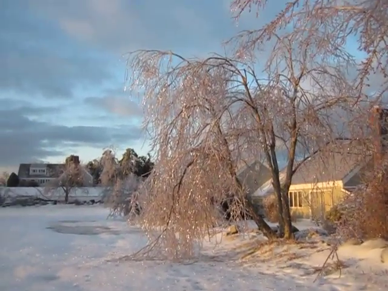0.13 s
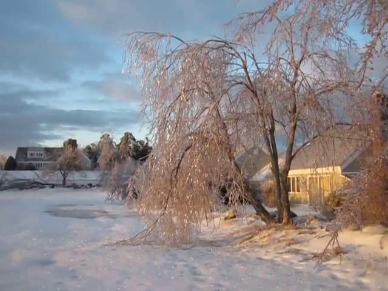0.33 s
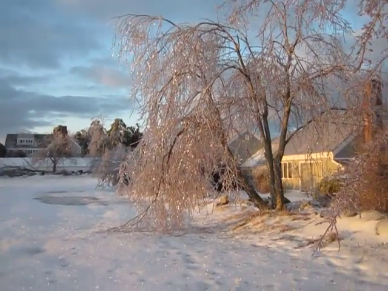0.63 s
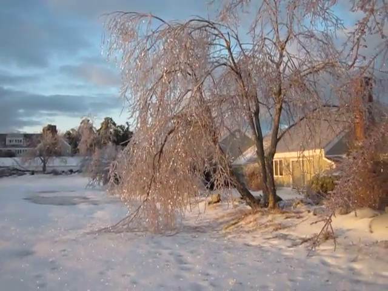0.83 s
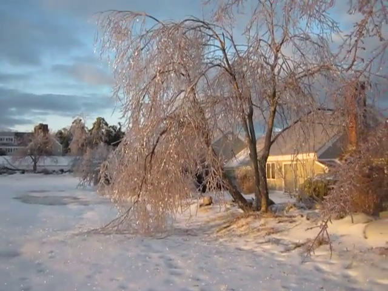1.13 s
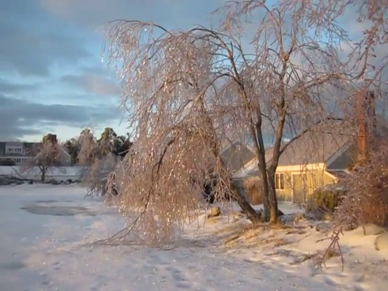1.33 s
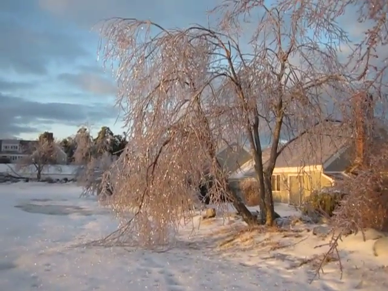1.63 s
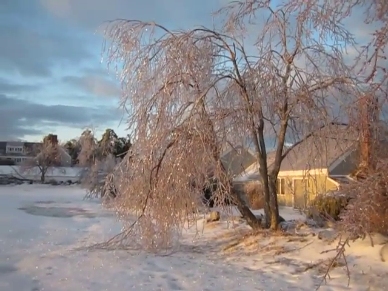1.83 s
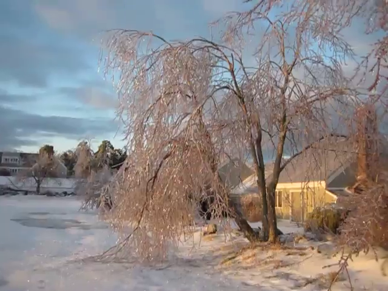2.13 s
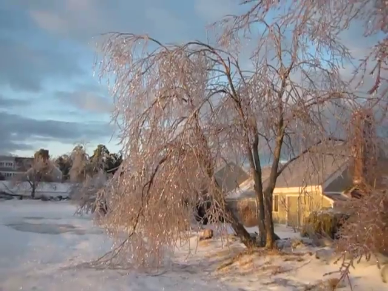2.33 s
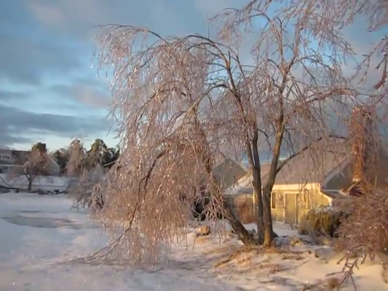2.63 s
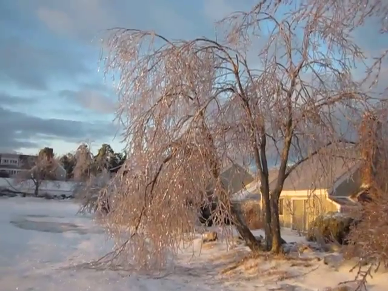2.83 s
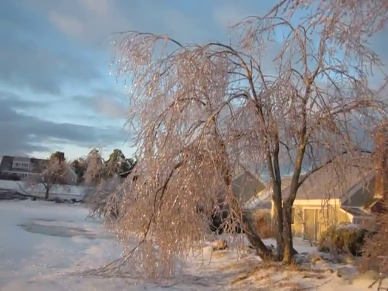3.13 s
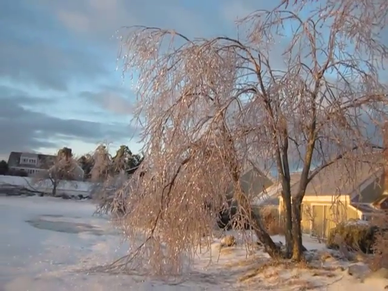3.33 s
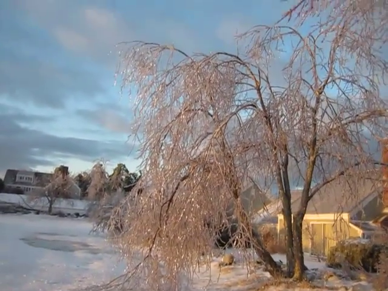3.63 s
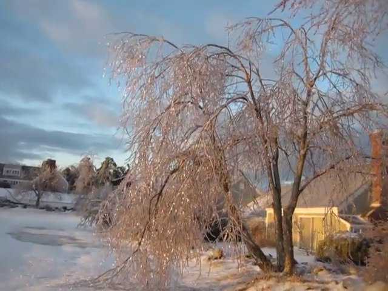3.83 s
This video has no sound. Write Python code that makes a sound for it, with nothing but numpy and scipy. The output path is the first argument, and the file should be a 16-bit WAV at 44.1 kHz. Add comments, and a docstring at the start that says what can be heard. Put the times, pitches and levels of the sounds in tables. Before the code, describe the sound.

Ice-coated twigs crack and tick sharply outdoors, with wind thumps on the microphone and faint hiss.

```python
"""Frozen twigs outdoors on a winter morning, close to a small camera: ice cracks and ticks.
Cracks and icy crumbs are noise bursts and random clicks through resonances; some cracks
set a small hard object ringing, as decaying sines. Splinters hiss after a few breaks.
Wind puffs thump the microphone as short falling-pitch swings over a low lumpy rumble.
The camera adds shaped noise as hiss and a narrow noise band as a thin whine."""
import sys
import numpy as np
from scipy import signal
from scipy.fft import rfft, irfft
from scipy.io import wavfile
from scipy.ndimage import uniform_filter1d

SR = 44100
rng = np.random.default_rng(int(sys.argv[2]) if len(sys.argv) > 2 else 0)


def log_audio(samples):
    """Write samples as a 16-bit WAV file to the path given in sys.argv[1]."""
    # one column per channel
    frames = np.atleast_2d(samples).T
    # limit to full scale, then quantise
    limited = np.clip(frames, -1, 1)
    pcm = np.round(limited * 32767).astype(np.int16)
    wavfile.write(sys.argv[1], SR, pcm)


N = 176400


def gain_of(db):
    """Decibels to amplitude gain."""
    return 10 ** (np.asarray(db) / 20)


def evened(x):
    """Scales to rms 1."""
    return x / np.sqrt(np.mean(x ** 2) + 1e-20)


def add(mix, start_s, sound):
    """Mixes a sound in at a time, cut at the end of the mix."""
    part = mix[max(round(start_s * SR), 0):][:len(sound)]
    part += sound[:len(part)]


def resonate(x, hz, pass_width_hz):
    """A two-pole band-pass, applied three times for steep sides."""
    b, a = signal.iirpeak(hz, hz / max(pass_width_hz, 5), SR)
    for _ in range(3):
        x = signal.lfilter(b, a, x)
    return x


def body(x, modes):
    """Colours a sound by parallel resonances of alternating polarity."""
    out = 0
    for k, (hz, pass_width_hz, level_db) in enumerate(modes):
        out = out + (-1) ** k * gain_of(level_db) * resonate(x, hz, pass_width_hz)
    return out


def follow(curve, column):
    """Gain over time from one dB column of a curve, linear in dB between rows."""
    rows = np.array(curve)
    return gain_of(np.interp(np.arange(N) / SR, rows[:, 0], rows[:, column]))


def grains(rate_per_s, spread_db):
    """Clicks at random times, random in sign and size, a few of them large."""
    boost_db = spread_db * np.minimum(rng.exponential(1, N), 4)
    size = gain_of(boost_db) * rng.standard_normal(N)
    return size * (rng.random(N) < rate_per_s / SR)


# Resonances of the four parts of a crack, low to high: pitch_hz, pass_width_hz, level_db
KNOCK = [(340, 446, 1.5), (650, 980, -4)]
SNAP = [(1096, 1070, 4.96), (1553, 523, 4.35), (1840, 810, 3.9)]
TICK = [(2934, 1300, 1.5), (3920, 1100, -5.5), (5155, 2100, 1.7)]
FIZZ = [(8970, 3700, -1), (11480, 3500, 3.5), (13700, 11400, -11)]
PARTS = [KNOCK, SNAP, TICK, FIZZ]
# Ice cracks: start_s, knock_db, snap_db, tick_db, fizz_db, length_ms
CRACKS = [(0.033, -72, -34.0, -55, -53, 2.1), (0.1096, -57, -43.5, -53, -57, 5.6),
          (0.3653, -43, -42, -55, -65, 3.4), (0.376, -45, -38, -64, -60, 8.9),
          (0.4122, -35.5, -38, -64, -50, 4.8), (0.4658, -45, -35, -42.5, -57, 1.6),
          (0.4808, -53, -55, -58, -47.5, 1.8), (0.5108, -63, -41.0, -40, -54, 0.98),
          (0.5184, -66, -60, -41, -37.5, 4.5), (0.529, -60, -24, -35, -58, 1.65),
          (0.5631, -35, -24, -24, -63, 2.8), (0.5774, -33, -25, -26.5, -46, 2.6),
          (0.6282, -40, -38, -47, -52, 11), (0.681, -58, -55, -37, -44, 7),
          (0.688, -54, -51.0, -38.5, -61, 0.7), (0.806, -43.5, -31, -44, -69, 1.7),
          (0.8881, -47, -28, -32.5, -66, 4.3), (0.9489, -47, -31, -39, -46, 15),
          (1.0266, -61, -63, -43, -51, 0.55), (1.125, -57, -60, -39, -42, 0.69),
          (1.1356, -39.5, -52, -33, -35.5, 1.5), (1.1387, -36.5, -28, -29.5, -33.5, 3.4),
          (1.15, -60, -27, -36, -45, 3.1), (1.1636, -66, -54, -42, -40, 1.5),
          (1.1973, -53, -24.5, -31, -52, 4.7), (1.288, -69, -60.0, -38.5, -47, 1),
          (1.302, -63, -31, -26, -66, 2.2), (1.3385, -73, -64, -38.5, -53.0, 1.6),
          (1.3606, -69, -61, -44, -49, 0.89), (1.4122, -44, -33, -40, -72.0, 5.1),
          (1.4196, -55, -34, -42, -67, 3.1), (1.437, -64, -38, -39, -52.0, 0.86),
          (1.5232, -65, -34.5, -40.5, -53.5, 2.2), (1.5322, -61.0, -29, -42, -68.0, 4.3),
          (1.555, -45, -34.5, -42.5, -63, 3.3), (1.7414, -49, -31.5, -46, -76, 2.9),
          (1.8147, -51, -39, -53, -70.0, 2), (1.8992, -21.5, -26.5, -25, -32.5, 3.4),
          (2.0522, -42.5, -39.5, -44.5, -37.5, 9.7), (2.0821, -29.5, -30, -35, -39, 3.8),
          (2.0879, -49, -36, -57, -37.5, 7.8), (2.097, -43, -31, -44, -45.0, 3),
          (2.1247, -30.5, -25, -39, -48, 1.9), (2.1837, -46, -30, -34.5, -59, 2.4),
          (2.1974, -46, -46, -37.5, -58.0, 1.9), (2.2071, -32, -60, -66, -66.0, 9.1),
          (2.215, -56, -37, -41, -71.0, 2.8), (2.257, -60, -35.5, -50, -73.0, 3),
          (2.272, -46, -23, -22.5, -52, 2.3), (2.3024, -41, -36, -40.5, -59, 3.7),
          (2.428, -54, -46, -46, -58, 1.5), (2.3152, -33, -36.5, -50, -53, 1.6),
          (2.3976, -27.5, -32.5, -52, -50.0, 1.6), (2.401, -36, -29.5, -37.5, -43, 8.4),
          (2.4139, -47.0, -25.5, -34, -52, 3.9), (2.5448, -44, -26, -28.5, -50, 4.2),
          (2.6333, -34.5, -35.5, -41, -59, 4.7), (2.646, -34, -38, -37.5, -57, 2.2),
          (2.655, -35, -25, -37.5, -49, 5.8), (2.7345, -65, -38.5, -62, -68, 2.4),
          (2.8228, -20.5, -46, -43.5, -45, 2.1), (2.83, -33, -40, -39, -50, 5),
          (2.846, -32.5, -41, -37.5, -42.5, 2.4), (2.8693, -46, -36.5, -47, -49, 1.7),
          (2.9118, -54, -29, -36, -62, 2.9), (2.9464, -22, -27, -34.5, -38, 6.0),
          (2.9704, -29, -29.5, -33, -34.5, 3.9), (2.9843, -33, -37, -42, -42.0, 2.4),
          (3.013, -57, -31, -31.5, -37.5, 34), (3.03, -20.5, -21.5, -30, -41, 4.4),
          (3.0357, -37, -41, -40, -48, 11), (3.0915, -36, -34, -44, -53, 3.4),
          (3.136, -63, -28.5, -56, -73.0, 1.9), (3.2584, -65, -65, -52, -47, 0.89),
          (3.2629, -33, -40, -44, -51, 3.6), (3.267, -28.5, -35.5, -39.5, -44, 4.3),
          (3.2736, -35, -32.5, -48, -45, 2.9), (3.285, -30.5, -38, -38.5, -47, 7),
          (3.336, -35.5, -42, -48, -50, 3), (3.355, -43, -43, -46, -50, 8),
          (3.369, -36.5, -39, -43, -50, 5.1), (3.4075, -39, -41, -48, -58, 8),
          (3.3812, -30, -43, -41.5, -52, 1.3), (3.4215, -35.5, -55, -47, -47.5, 10),
          (3.439, -32, -56, -49, -63, 4.1), (3.4617, -31.5, -40, -40, -51, 2.3),
          (3.4777, -45, -34, -35, -66, 1.3), (3.5394, -44, -43, -39, -48.5, 3.1),
          (3.561, -51, -35, -32, -52, 1.8), (3.5927, -35.5, -30.5, -42, -55.0, 15),
          (3.6048, -29.5, -36, -42, -45, 7), (3.6128, -56, -27.5, -32, -36, 5.6),
          (3.6494, -59, -46, -43, -55, 2.3), (3.6883, -44, -32.5, -44, -65, 2.3),
          (3.6957, -55, -24.5, -42, -63, 3), (3.7063, -44, -30.5, -41, -49, 0.93),
          (3.7232, -61, -26.5, -27.5, -36, 10), (3.7489, -46, -23, -24.5, -52, 5.7),
          (3.7718, -41, -32, -36, -60.0, 8.7), (3.7794, -41, -46, -46, -61.0, 5),
          (3.796, -49, -51, -41, -71.0, 1.6), (3.807, -62, -58, -43, -67, 1.5),
          (3.8747, -43, -29.0, -41, -61, 4), (3.9505, -59, -35.0, -32, -59, 1.8)]
FIRST_BREAK = 16.3  # first sample = this / length_ms
TAIL_DB, TAIL_S = [-19, -5, -9.5, 5], 0.0056  # scatter off the snow, per part


def cracks():
    """A sharp break, then fading noise for a run of smaller ones, excites four resonant parts."""
    out, t = np.zeros(N), np.arange(2000) / SR
    rows = np.array(CRACKS)
    length_ms = rows[:, 5]
    noise = rng.standard_normal((len(rows), len(t)))
    noise[:, 0] = FIRST_BREAK / length_ms  # short cracks start hardest
    fall = np.exp(-2 * t / np.maximum(length_ms[:, None] / 1000, 2e-4))
    mix = 0
    for k, part in enumerate(PARTS):
        tail = gain_of(TAIL_DB[k]) * np.exp(-t / TAIL_S)
        sound = body(noise * (fall + tail), part)
        # 0 dB = the energy of 300 samples at rms 1
        strength = np.sqrt((sound ** 2).sum(1, keepdims=True) / 300)
        mix = mix + gain_of(rows[:, 1 + k:2 + k]) * sound / strength
    for start_s, sound in zip(rows[:, 0], mix):
        add(out, start_s, sound)
    return out


def tone(hz, level_db, t60_s):
    """A sine losing 60 dB per t60_s, after a 4.6 ms linear swell."""
    t = np.arange(SR // 2) / SR
    swell = np.minimum(t / 0.0046, 1)
    return gain_of(level_db - 60 * t / t60_s) * np.sin(2 * np.pi * hz * t) * swell


# Tones of the ringing object, lower then upper: pitch_hz, t60_s
RING = [(1021, .29), (1931, .1)]
# Cracks that set the object ringing: start_s, lower_tone_db, upper_tone_db
RINGS = [(0.525, -32, -25.5), (0.5633, -33, -44), (0.5785, -27.5, -42), (0.806, -38.5, -36.5),
         (0.8884, -40.5, -44), (0.9491, -43, -35), (1.1491, -40.5, -29), (1.198, -41, -33.5),
         (1.5326, -41, -43), (1.7421, -46, -36), (2.183, -39, -41), (2.257, -33.5, -56), (2.2724, -65, -35),
         (2.4042, -35.5, -40), (2.9144, -36, -37), (3.0153, -55, -29.5), (3.1357, -38.5, -41),
         (3.7294, -54, -33), (3.756, -33.5, -44), (3.7793, -60, -36), (3.8753, -37, -58)]
# Ping of one icicle: start_s, pitch_hz, level_db, t60_s
PING = [(.579, 3575, -53, 1.5), (.579, 4463, -56, .7)]


def rings():
    """Two modes of a small hard object, and an icicle's ping, die away as sines."""
    out = np.zeros(N)
    for start_s, *levels_db in RINGS:
        for (hz, t60_s), level_db in zip(RING, levels_db):
            add(out, start_s, tone(hz, level_db, t60_s))
    for start_s, hz, level_db, t60_s in PING:
        add(out, start_s, tone(hz, level_db, t60_s))
    return out


# Splinters falling after breaks: start_s, level_db, fade_s
SHATTERS = [(1.905, -47, .08), (3.3, -49, .17), (3.54, -49, .1)]


def shatter():
    """Fine splinters: dense clicks through the tick resonances, under a Gaussian fade."""
    t = np.arange(N) / SR
    fall = 0
    for start_s, level_db, fade_s in SHATTERS:
        fall = fall + gain_of(level_db) * (t > start_s) * np.exp(-((t - start_s) / fade_s) ** 2)
    return fall * evened(body(grains(rate_per_s=6000, spread_db=3), TICK))


# Icy crumbs: start_s, low_crunch_db, middle_db, treble_db
RUSTLE = [(0, -49.5, -38, -46), (0.07, -59.5, -52.5, -68), (0.355, -56.5, -55, -68), (0.37, -41, -45, -63),
          (0.48, -38, -46.5, -55), (0.5, -57, -51, -59), (0.6, -54.5, -55, -62.5), (1.1, -62, -55.5, -64),
          (1.14, -62, -42.5, -53), (1.21, -46.5, -48, -60), (1.58, -71, -51.5, -67),
          (1.89, -53.5, -56, -75), (1.91, -47, -48.5, -51), (2.02, -57, -54, -63), (2.06, -59, -51, -60),
          (2.11, -46, -48, -49), (2.17, -50, -52, -62), (2.61, -57, -56, -71), (2.65, -39, -54, -50),
          (2.7, -69, -49.5, -65), (2.81, -43, -58.5, -66), (2.85, -45, -45, -53), (2.9, -57, -53, -68),
          (2.96, -43, -49.5, -58), (3.04, -51, -38, -44), (3.12, -57, -51.5, -61), (3.24, -58, -57, -71),
          (3.28, -38, -41, -44), (3.31, -53, -52, -56.5), (3.38, -45, -50, -49.5), (3.47, -47, -47, -53.5),
          (3.52, -53, -52.5, -61), (3.61, -39.5, -42, -46), (3.66, -61, -52.5, -60), (3.72, -42, -40, -47),
          (3.81, -61, -50.5, -65), (4, -51.5, -49, -67)]
# Grain rate of knock, snap, tick, fizz: rate_per_s
GRAINS_PER_S = [1300, 3000, 6000, 8000]
# Grain size spread of knock, snap, tick, fizz: spread_db
GRAIN_SPREAD_DB = [3.6, 3.6, 3, 3]
CLUMP_S, CLUMP_DB = 0.01, 3.5  # smoothing window, rms level swing
TICK_GRAINS_DB = -5  # relative to the snap grains


def rustle():
    """Dense icy grains in clumps, coarse ones low and fine ones high."""
    knock, snap, tick, fizz = [evened(body(grains(rate_per_s, spread_db), part))
                               for rate_per_s, spread_db, part
                               in zip(GRAINS_PER_S, GRAIN_SPREAD_DB, PARTS)]
    width = round(CLUMP_S * SR)
    drift = uniform_filter1d(uniform_filter1d(rng.standard_normal(N), width), width)
    clumps = evened(gain_of(CLUMP_DB * evened(drift)))
    low = follow(RUSTLE, column=1) * knock
    middle = follow(RUSTLE, column=2) * (snap + gain_of(TICK_GRAINS_DB) * tick)
    treble = follow(RUSTLE, column=3) * fizz
    return clumps * (low + middle + treble)


def far_ticks():
    """Tiny bright ticks from twigs further off: sparse clicks of widely spread size."""
    out = 0
    for part, level_db in [(FIZZ, -75.5), (TICK, -69.5)]:
        clicks = grains(rate_per_s=41, spread_db=11.5)
        out = out + gain_of(level_db) * evened(body(clicks, part))
    return out


# Wind puffs: centre_s, level_db, pitch_hz
THUMPS = [(0.018, -31, 147), (0.572, -26, 114), (1.1453, -24, 170), (1.4264, -24.5, 108), (1.5208, -31, 97),
          (1.56, -30.5, 138), (1.589, -15, 118), (1.6, -17, 129), (1.63, -17, 148), (1.656, -26.5, 89.5),
          (1.6684, -25.5, 144), (1.9019, -15, 163), (1.915, -21, 109), (2.0907, -28, 92),
          (2.1187, -28, 108), (2.1435, -20, 144), (2.1863, -28, 70), (2.2125, -19, 139), (2.289, -31.5, 99),
          (3.0868, -28.5, 115), (3.284, -27.5, 127), (3.6128, -26, 164)]
THUMP_TURNS = 0.45  # cycles from the centre to 1/e
THUMP_SAG = 0.42  # pitch fall through each puff


def thumps():
    """Each puff swings the membrane briefly: two Gaussian wavelets of falling pitch."""
    out, t = np.zeros(N), np.arange(-700, 1500) / SR
    phases = rng.uniform(0, 2 * np.pi, len(THUMPS))
    for (centre_s, level_db, hz), phase in zip(THUMPS, phases):
        wave = 0
        for ratio, partial_db in [(1, 0), (2.2, -9)]:
            turns = hz * ratio * t
            swell = np.exp(-(turns / THUMP_TURNS) ** 2)
            swing = np.cos(2 * np.pi * (turns - THUMP_SAG * turns ** 2) + phase)
            wave = wave + gain_of(partial_db) * swell * swing
        add(out, centre_s + t[0], gain_of(level_db) * wave)
    return out


# Wind rumble: start_s, level_db
RUMBLE = [(0, -64.5), (1.35, -56.5), (1.6, -32), (1.75, -45), (2.0, -47), (2.15, -33), (2.35, -55.5),
          (4, -57)]


def rumble():
    """Low lumpy wind noise: random clicks through one low resonance."""
    lumps = resonate(grains(rate_per_s=90, spread_db=4.2), hz=66, pass_width_hz=150)
    return follow(RUMBLE, column=1) * evened(lumps)


# Spectrum shape of the camera's hiss: frequency_hz, relative_db_per_hz
HISS = [(12, -38), (20, 3.5), (142, 3), (624, -6.5), (1000, -6.5), (1260, -16), (1570, -5), (2750, -13),
        (5080, -21.5), (7950, -18), (12400, -33.5), (16000, -25)]
HISS_DB = -50.5
WHINE_HZ, WHINE_PASS_WIDTH_HZ, WHINE_DB = 7868, 60, -74


def hiss():
    """Steady camera noise shaped in frequency, and a narrow noise band as the thin whine."""
    hz = np.fft.rfftfreq(N, 1 / SR)
    curve_hz, curve_db = np.transpose(HISS)
    shape = gain_of(np.interp(np.log(hz + 1), np.log(curve_hz + 1), curve_db))
    floor = irfft(rfft(rng.standard_normal(N)) * shape, N)
    whine = resonate(rng.standard_normal(N), WHINE_HZ, WHINE_PASS_WIDTH_HZ)
    return gain_of(HISS_DB) * evened(floor) + gain_of(WHINE_DB) * evened(whine)


def scene():
    """All sources summed at the microphone, one channel."""
    near = cracks() + rings() + shatter() + rustle()
    background = far_ticks() + thumps() + rumble() + hiss()
    return (near + background)[None]


NOTCH_HZ, NOTCH_WIDTH_HZ = 6310, 3730  # dead spot of the microphone housing
EDGE_HZ = 15850


def record(dry):
    """The housing's dead spot, with a trace of dry sound left in, then a low-pass band limit."""
    b, a = signal.iirnotch(NOTCH_HZ, NOTCH_HZ / NOTCH_WIDTH_HZ, SR)
    notched = signal.lfilter(b, a, dry) + 0.0043 * dry
    low_pass = signal.firwin(511, EDGE_HZ, window=("kaiser", 9), fs=SR)
    return signal.oaconvolve(notched, low_pass[None], "same")


dry = scene()
out = record(dry)
log_audio(out)
```